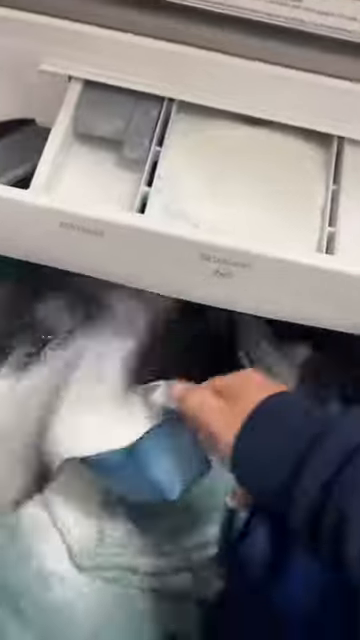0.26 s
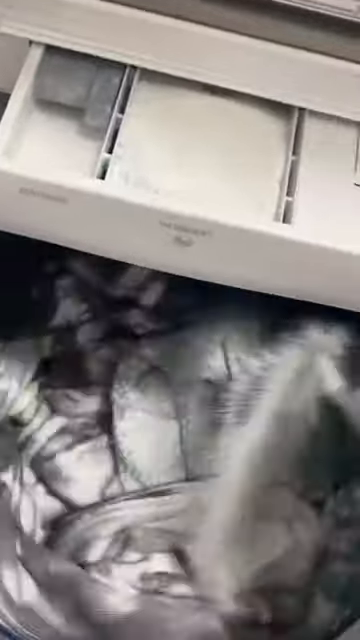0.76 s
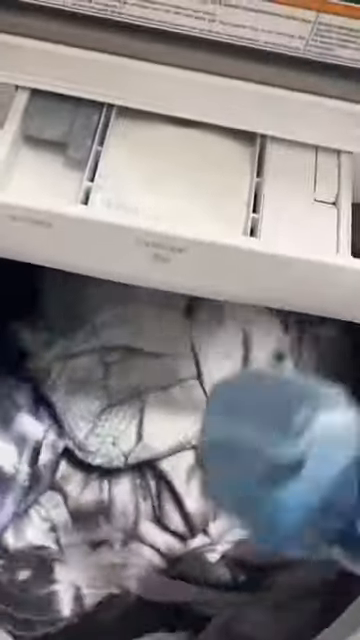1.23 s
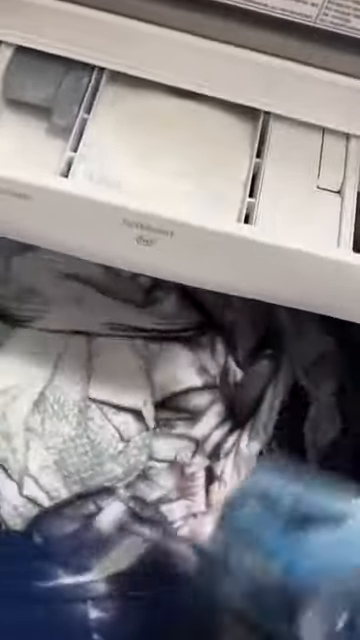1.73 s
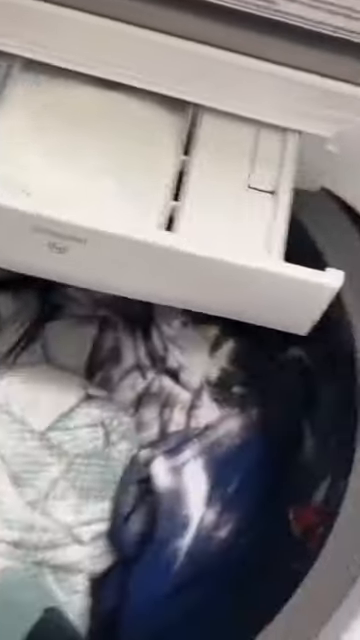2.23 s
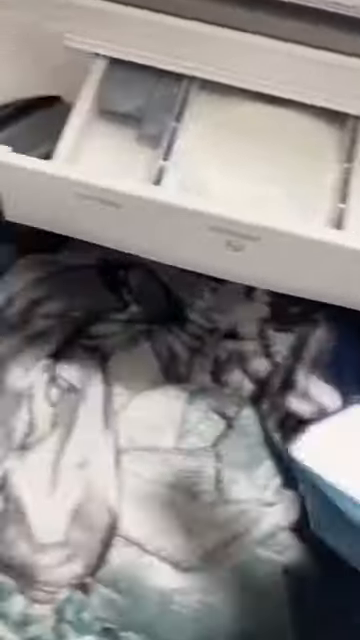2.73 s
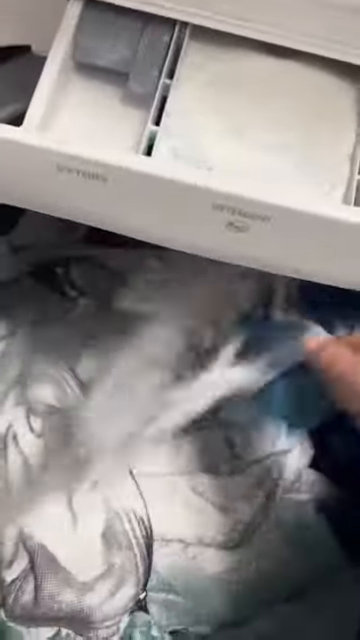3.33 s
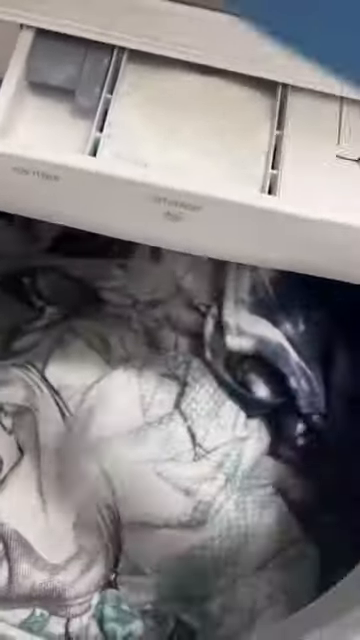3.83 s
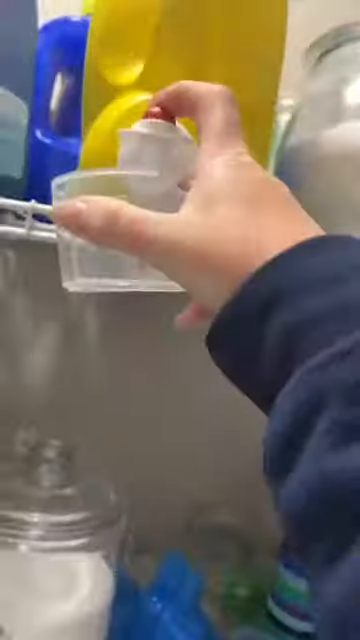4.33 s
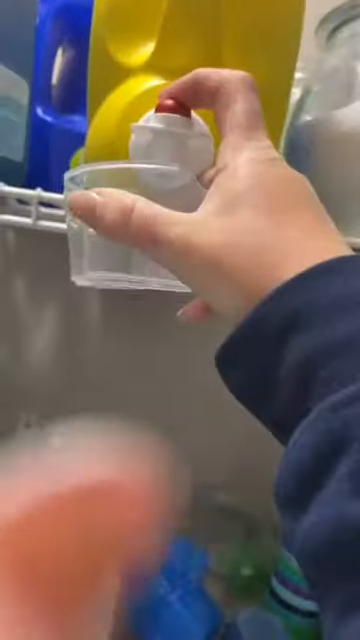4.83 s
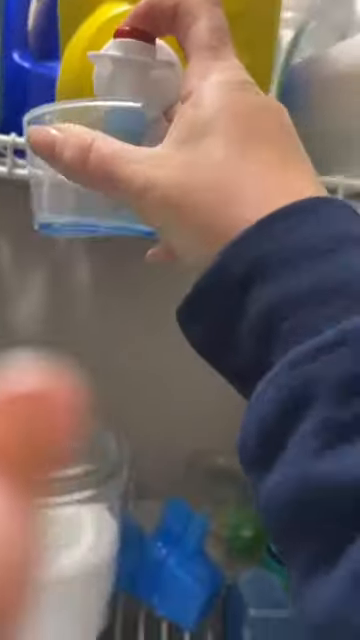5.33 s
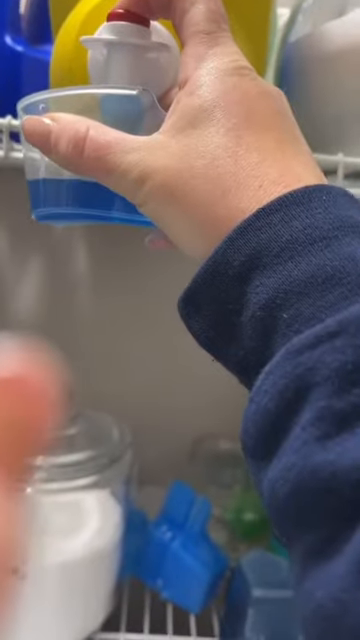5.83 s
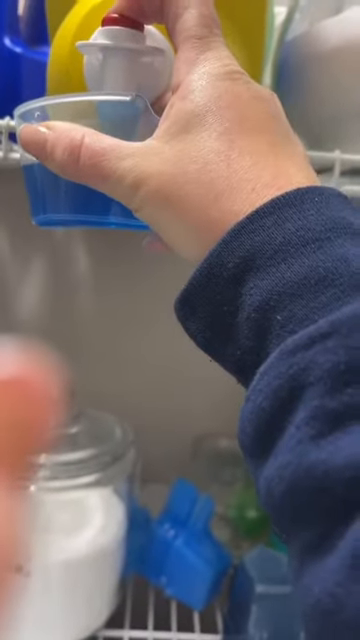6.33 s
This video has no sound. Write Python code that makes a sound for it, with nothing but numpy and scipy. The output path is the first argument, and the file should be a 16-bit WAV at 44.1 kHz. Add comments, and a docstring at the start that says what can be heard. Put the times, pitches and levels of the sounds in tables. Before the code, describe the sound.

Plastic scoop clatters between soft sprays of washing powder and a crunchy refill; after a brief silence, a button squelches and detergent trickles over room hum.

```python
"""Powder sifts from a shaken plastic scoop onto laundry in a top-loading machine: coloured grains in spurts.
The scoop is knocked empty (clicks and rattle through plastic modes); the steel drum is bumped and booms.
The scoop crunches into the powder box to refill, then pours and is knocked empty again.
After a short silence, a quiet room: hiss and mains hum start with a brief buzz, a tap button squelches,
the cup ticks in the fingers and liquid detergent trickles into it as random grains through cup modes."""
import sys
import numpy as np
from scipy import signal
from scipy.fft import rfft, irfft
from scipy.io import wavfile

SR = 44100
rng = np.random.default_rng(int(sys.argv[2]) if len(sys.argv) > 2 else 0)


def generate_wav(sig):
    """Save sig (samples, or channels by samples) to the path in sys.argv[1] as 16-bit PCM at SR."""
    pcm = np.round(np.clip(np.atleast_2d(sig).T, -1, 1) * 32767).astype(np.int16)
    wavfile.write(sys.argv[1], SR, pcm)


N = 289458
TIME = np.arange(N) / SR  # s
TAPS = 4096  # filter length, samples
HZ = np.fft.rfftfreq(TAPS, 1 / SR)

# scoop knocks: t/s, blow/dB, rattle/dB, rattle peak re blow/s, rattle fall/s, powder left/0-1,
# contact/0 side - 1 rim, tilt/dB per octave
KNOCKS = [(0.7355, -26.5, -39, .004, .014, .4, .2, -1.8), (1.2370, -64, -50, 0, .012, .5, .2, -5),
          (1.4145, -33, -21.5, .003, .018, 1, 0, -3.4), (1.5055, -27, -23, -.001, .023, .9, .1, .6),
          (1.6160, -24.5, -23, -.005, .018, 0, .1, .3), (1.7070, -19.5, -26, -.002, .02, 0, .1, .3),
          (3.4360, -36.5, -44, -.004, .01, .3, 1, 4), (3.6030, -44, -42, .007, .012, .6, .4, .2),
          (3.9515, -17, -17.5, .002, .02, 1, .55, .5), (4.0478, -15.5, -20.5, .001, .023, .5, .85, .1),
          (4.1605, -14, -24, .001, .016, .1, 1, .8)]
# silence between the two places: start/s, end/s
PAUSE_S = (4.340, 4.449)


def amp(db):
    """Decibels to gain."""
    return 10 ** (np.asarray(db) / 20)


def evened(x):
    """Scales to rms 1."""
    return x / np.sqrt(np.mean(x ** 2) + 1e-20)


def read(points, hz=HZ):
    """Interpolates an (f, value) table on a log-frequency axis."""
    f, value = np.transpose(points)
    return np.interp(np.log(hz + 1), np.log(f + 1), value)


def add(mix, s, sound):
    """Mixes a sound into mix, in place, at time s."""
    start = round(s * SR)
    sound = sound[max(-start, 0):]
    part = mix[max(start, 0):][:len(sound)]
    part += sound[:len(part)]


def resonances(modes):
    """Gain over frequency of a body with (Hz, width Hz, dB) modes; their powers add."""
    power = sum(amp(db) ** 2 / (1 + ((HZ - hz) / width) ** 2 * 2) ** 2 for hz, width, db in modes)
    return np.sqrt(power) + amp(-75)


def colour(x, gain):
    """Minimum-phase filter of unit energy with the given gain shape over frequency."""
    cepstrum = irfft(np.log(np.maximum(gain / gain.max(), amp(-100))))
    cepstrum[1:TAPS // 2] *= 2  # fold to the causal side
    cepstrum[TAPS // 2 + 1:] = 0
    ring = irfft(np.exp(rfft(cepstrum)))
    return signal.oaconvolve(x, ring / np.linalg.norm(ring))[:len(x)]


def blow(db, spread_s, soft_hz=7000):
    """A click of this rms over 10 ms before softening; the wall's dispersion delays its treble most."""
    phase = np.pi * spread_s * HZ ** 2 / HZ[-1]
    click = irfft(np.exp(-1j * phase) / np.hypot(1, HZ / soft_hz))[:TAPS // 2]
    return amp(db) * np.sqrt(SR / 100) * click


def swell(t, rise, fall):
    """Exponential growth up to t = 0 and decay after it."""
    return np.exp(np.minimum(t / rise, -t / fall).clip(-60))


def grains(size, per_s, spread_db):
    """Random tiny impacts of uneven size, rms 1."""
    sizes = amp(spread_db * np.minimum(rng.exponential(1, size), 4))
    hits = rng.random(size) < per_s / SR
    return evened(sizes * rng.standard_normal(size) * hits)


def bursts(rows, rise):
    """Gain over time of (peak s, dB, fall s) bursts whose powers add."""
    power, t = np.zeros(N), np.arange(-SR // 4, SR) / SR
    for s, db, fall in rows:
        add(power, s + t[0], (amp(db) * swell(t, rise, fall)) ** 2)
    return np.sqrt(power)


def held(start, end, rise, fall):
    """Gain over time: exponential attack up to start, hold until end, exponential release."""
    return swell(TIME - np.clip(TIME, start, end), rise, fall)


def settling():
    """Gain over time of the laundry as it shifts and settles after each movement."""
    # settles: t/s, level/dB
    settles = [(.31, -53), (.80, -48), (1.78, -54), (2.22, -59), (2.80, -53), (3.72, -56), (4.23, -54)]
    rise_s, fall_s = .05, .105
    return bursts([(s, db, fall_s) for s, db in settles], rise_s)


def air():
    """Low noise of the room round the machine; swells as the laundry shifts."""
    # noise spectrum: f/Hz, level/dB
    air_spectrum = [(25, 3), (60, 0), (135, 2), (220, -6), (500, -8.5), (750, -12), (1150, -12),
                    (1600, -19), (2500, -21), (4200, -23), (7800, -28), (10500, -37), (15500, -40)]
    still_db = -62.5
    level = np.hypot(amp(still_db), settling())
    return level * colour(rng.standard_normal(N), amp(read(air_spectrum)))


def spurts(first, last, db):
    """One (s, dB, fall s) spurt per shake of the wrist: arched over the pour, slightly uneven."""
    shake_s, fall_s = .0513, .016
    arch_db, scatter_db = 7, 1
    times = np.arange(first, last + shake_s / 2, shake_s)
    arch = np.sin(np.pi * np.linspace(.1, .75, num=len(times)))
    uneven = rng.standard_normal(size=32)
    return [(s, db + arch_db * (a - 1) + scatter_db * u, fall_s)
            for s, a, u in zip(times, arch, uneven)]


def powder():
    """Grains land on cloth in a steady sift and a spurt per shake, then slide down the folds with a thin hiss."""
    # pours: first shake/s, last shake/s, sift/dB, spurt/dB
    pours = [(.14, .70, -57.5, -46.5), (3.078, 3.595, -52.8, -43.8)]
    # landing spectrum: f/Hz, level/dB
    landing_spectrum = [(150, -14), (330, -8), (560, -6), (790, 0), (1170, -1.5), (1600, -8), (2450, .5),
                        (4100, -12.5), (7700, -12), (9000, -17), (10500, -23), (15500, -25)]
    # slide modes: f/Hz, width/Hz, level/dB
    slide_modes = [(4250, 300, 0), (5500, 900, -10), (2800, 900, -7)]
    sift_rise_s, sift_fall_s, spurt_rise_s = .055, .16, .0055
    slide_after_s, slide_db, slide_rise_s, slide_fall_s = .21, -58, .09, .04
    settle_powder_db = -5  # loose powder trickling as the laundry settles, re settling
    flow = amp(settle_powder_db) * settling()
    for first, last, sift_db, spurt_db in pours:
        sift = amp(sift_db) * held(first, last, sift_rise_s, sift_fall_s)
        shaken = bursts(spurts(first, last, spurt_db), spurt_rise_s)
        flow = np.hypot(flow, np.hypot(sift, shaken))
    landing = colour(flow * grains(N, per_s=14000, spread_db=1.4), amp(read(landing_spectrum)))
    slide_rows = [(last + slide_after_s, slide_db, slide_fall_s) for _, last, _, _ in pours]
    slides = bursts(slide_rows, slide_rise_s)
    return landing + colour(slides * rng.standard_normal(N), resonances(slide_modes))


def room(x):
    """A small hard room: sparse reflections, each band dying at its own speed."""
    # decay: f/Hz, t60/s
    decay = [(120, .55), (400, .5), (1200, .28), (2200, .2), (4000, .19), (12000, .14)]
    t = np.arange(SR) / SR
    taps = rng.standard_normal(SR) * (rng.random(SR) < 3000 / SR) * (t > .005)
    hz, frame_s, z = signal.stft(taps, SR, nperseg=256)
    fading = amp(-60 * frame_s / read(decay, hz)[:, None])
    dulling = np.hypot(1, hz / 2200)[:, None]
    tail = signal.istft(z * fading / dulling, SR, nperseg=256)[1]
    return signal.oaconvolve(x, tail / np.linalg.norm(tail))[:N]


def thumps(sag=.15, ragged=.3, ragged_hz=45):
    """Soft thumps of hand and laundry: a short, raggedly modulated sine arch that sinks slightly in pitch."""
    # thumps: t/s, level/dB, f/Hz, length/s
    soft_blows = [(.27, -45, 140, .08), (.29, -40, 72, .055), (.755, -36, 70, .04), (.785, -42, 170, .06),
                  (1.665, -35, 60, .04), (1.76, -38, 80, .05), (2.70, -40, 58, .05),
                  (2.703, -28.5, 180, .035), (2.825, -42, 165, .025), (3.13, -41, 280, .045),
                  (3.602, -38, 230, .025), (3.625, -43, 165, .055), (4.29, -38, 105, .05)]
    out = np.zeros(N)
    for s, db, hz, length in soft_blows:
        t = np.arange(0, length, 1 / SR)
        cycles = hz * t * (1 + sag * (1 - t / length) / 2)
        add(out, s, amp(db) * np.sin(np.pi * t / length) * np.sin(2 * np.pi * cycles))
    return out * (1 + ragged * colour(rng.standard_normal(N), resonances([(ragged_hz, ragged_hz, 0)])))


def scoop(spread_s=.004, roundness=1.7):
    """Powder rattles in a rounded swell around each blow and the scoop chatters; all ring the plastic."""
    # scoop modes: f/Hz, width/Hz, side-struck level/dB, rim-struck level/dB
    scoop_modes = [(275, 150, -15, -20), (540, 130, -7, -17), (870, 100, -17, -8.5), (1040, 110, -1.5, -11),
                   (1155, 115, -6, 1), (1280, 130, -.5, -11), (1500, 160, -20, -13), (1720, 180, -13, -18),
                   (2020, 150, -16, -6.5), (2290, 170, -13, -19), (2560, 200, -23, -10),
                   (3000, 260, -19, -17), (3650, 450, -23.5, -20.5), (5000, 350, -28, -22),
                   (5750, 500, -29, -23), (7100, 900, -26, -24), (8700, 1200, -32.5, -27.5),
                   (14000, 5000, -43, -37)]
    rattle_rise_s = .014
    crack_db, crack_s = 6, .002  # wall crunch on contact: level re blow
    gap_s, gap_ratio, loss_db = .0075, .8, 4  # rebounds: first gap, ratio of gaps, loss per contact
    empty_rebound_db, loaded_rebound_db = -18, -3  # first rebound re blow
    load_damping = .5  # share by which a full load widens the modes
    out, t = np.zeros(N), np.arange(-SR // 10, SR // 8) / SR
    for s, blow_db, rattle_db, lag, fall, load, rim, tilt_db in KNOCKS:
        rattle_swell = np.exp(-np.maximum((lag - t) / rattle_rise_s, (t - lag) / fall) ** roundness)
        crack = amp(blow_db + crack_db) * swell(t - crack_s, crack_s / 2, crack_s)
        level = np.hypot(amp(rattle_db) * rattle_swell, crack)
        force = level * grains(len(t), per_s=9000, spread_db=1.1)
        add(force, -t[0], blow(blow_db, spread_s, soft_hz=10000))
        rebound_db = empty_rebound_db + load * (loaded_rebound_db - empty_rebound_db)
        delays = np.cumsum(gap_s * gap_ratio ** np.arange(3))
        for k, delay in enumerate(delays):
            add(force, delay - t[0], blow(blow_db + rebound_db - k * loss_db, spread_s, soft_hz=4000))
        body = resonances([(hz, width * (1 + load_damping * load), side + rim * (edge - side))
                           for hz, width, side, edge in scoop_modes])
        tilt = amp(tilt_db * np.log2(HZ / 1200 + .2))
        add(out, s + t[0], colour(force, body * tilt))
    return out


def drum(knocks, rock_hz=900):
    """The steel drum booms and judders when bumped, rocks on dully, clinks, and rings faintly with the scoop."""
    # bumps: t/s, blow/dB, judder/dB
    bumps = [(0.7480, -47, -45), (0.7970, -50, -43), (1.4150, -38, -33), (1.9975, -24, -20),
             (2.1900, -45, -41), (2.7200, -40, -34)]
    # clinks against the stops: t/s, level/dB, fall/s
    clink_rows = [(1.9970, -38, .011), (2.0340, -38, .03), (2.1280, -39, .008), (2.2610, -47, .006)]
    # drum modes: f/Hz, width/Hz, level/dB
    drum_modes = [(137, 18, 4), (185, 40, -1.5), (247, 24, 0), (314, 26, -1), (410, 28, 4), (480, 45, -6),
                  (549, 22, 0), (678, 50, -12), (781, 50, -11), (920, 70, -8), (1046, 60, -3.5),
                  (1265, 80, -5), (1900, 800, -26)]
    # clink spectrum: f/Hz, level/dB
    clink_spectrum = [(500, -20), (1300, -2), (2500, 0), (4500, -12), (7000, -11), (9000, -15),
                      (10500, -25), (15500, -29)]
    judder_fall_s, rock_fall_s = .032, .13
    rock_db = -13  # re judder
    clink_boom_db = 2  # drive of the drum re clink
    clinks = bursts(clink_rows, rise=.0015)
    judder = bursts([(s, db, judder_fall_s) for s, _, db in bumps], rise=.005)
    force = np.hypot(judder, amp(clink_boom_db) * clinks) * grains(N, per_s=1500, spread_db=1.2)
    for s, db, _ in bumps:
        add(force, s, blow(db, spread_s=.003))
    rocking = bursts([(s, db + rock_db, rock_fall_s) for s, _, db in bumps], rise=.005)
    rocking = rocking * grains(N, per_s=600, spread_db=1.2)
    body = resonances(drum_modes)
    boom = colour(force + amp(-33) * knocks, body)
    dull = colour(rocking, body / (1 + (HZ / rock_hz) ** 2))
    return boom + dull + colour(clinks * grains(N, per_s=9000, spread_db=1.5), amp(read(clink_spectrum)))


def jolts():
    """The tub answers each knock of the scoop with a dull thud: a grain burst through tub modes."""
    # tub modes: f/Hz, width/Hz, level/dB
    tub_modes = [(250, 130, 0), (400, 200, -1), (650, 200, -6)]
    after_s, jolt_db, fall_s = .008, -13, .014  # level re blow
    push = bursts([(s + after_s, db + jolt_db, fall_s) for s, db, *_ in KNOCKS], rise=.002)
    return colour(push * grains(N, per_s=2500, spread_db=1.1), resonances(tub_modes))


def sleeve():
    """Cloth brushes on cloth as the arm moves: grains under Gaussian swells."""
    # swishes: t/s, level/dB, sigma/s
    swishes = [(1.125, -57, .052), (2.372, -49, .021), (2.548, -57, .012), (2.905, -59, .015)]
    # cloth spectrum: f/Hz, level/dB
    cloth_spectrum = [(400, -14), (800, -5), (1180, 0), (1630, -6), (2900, -5), (5000, -11), (8000, -8),
                      (10500, -18), (15500, -21)]
    speed = sum(amp(db) * np.exp(-((TIME - s) / sigma) ** 2 / 2) for s, db, sigma in swishes)
    return colour(speed * grains(N, per_s=9000, spread_db=2.2), amp(read(cloth_spectrum)))


def refill():
    """The scoop thuds into the powder box (a click through its modes) and crunches through the grains."""
    # thrust: t/s, blow/dB, crunch/dB, rise/s, fall/s
    thrust = (2.7093, -21, -24.5, .006, .02)
    # box modes: f/Hz, width/Hz, level/dB
    box_modes = [(175, 55, 4), (270, 70, -3), (530, 130, 1), (900, 400, -10)]
    # crunch spectrum: f/Hz, level/dB
    crunch_spectrum = [(60, -14), (150, 0), (350, -7), (520, -4), (800, -13), (1100, -11), (1450, -16),
                       (2500, -11), (3300, -18), (4500, -29), (5700, -24), (9000, -33), (10500, -38),
                       (15500, -41)]
    s, blow_db, crunch_db, rise, fall = thrust
    force = np.zeros(N)
    add(force, s, blow(blow_db, spread_s=.003))
    crunch = bursts([(s + .007, crunch_db, fall)], rise) * grains(N, per_s=10000, spread_db=1.5)
    return colour(force, resonances(box_modes)) + colour(crunch, amp(read(crunch_spectrum)))


def hum():
    """Fan-like hiss in fixed resonances and wavering mains harmonics that start with a brief buzz."""
    # hiss spectrum: f/Hz, level/dB
    hiss_spectrum = [(25, -17), (75, -15), (130, -1), (180, -1), (240, -8), (330, -4), (700, -2),
                     (1100, -8.5), (2000, -8.5), (4000, -12.5), (5800, -13.5), (7800, -10.5), (9000, -16),
                     (10500, -24), (15800, -27)]
    # hiss resonances: f/Hz, width/Hz, boost/dB
    hiss_peaks = [(130, 25, 5), (515, 45, 5), (600, 25, 2), (725, 60, 6), (955, 30, 4), (1615, 45, 6),
                  (2990, 60, 4), (8000, 1200, 2)]
    # harmonics: f/Hz, mean rms at the end/dB, rms added by the buzz/dB
    harmonics = [(120, -71, -72), (360, -59.5, -60), (480, -72, -57), (600, -74, -57), (720, -72, -61)]
    hiss_db, growth_db_per_s = -55.7, 2.6  # level at the end of the pause; grows as the cup fills
    hum_growth = 1.8  # hum follows hiss gain to this power
    buzz_end_s, buzz_fade_s = 4.535, .03
    boosts_db = sum(db / (1 + (2 * (HZ - hz) / width) ** 2) for hz, width, db in hiss_peaks)
    loud = amp(hiss_db + growth_db_per_s * (TIME - PAUSE_S[1]))
    out = loud * colour(rng.standard_normal(N), amp(read(hiss_spectrum) + boosts_db))
    buzz = np.clip((buzz_end_s - TIME) / buzz_fade_s, 0, 1)
    for hz, db, buzz_db in harmonics:
        waver = np.interp(TIME, np.linspace(0, TIME[-1], num=50), rng.standard_normal(size=50))
        steady = amp(db) * (loud / loud.max()) ** hum_growth * (1 + .25 * waver)
        rms = steady + amp(buzz_db) * buzz
        out += np.sqrt(2) * rms * np.sin(2 * np.pi * (hz * TIME + rng.random()))
    return out


def tap():
    """A rubber button squelches in, the cup ticks in the fingers, thick liquid trickles into the plastic cup."""
    # button press: t/s, level/dB, rise/s, fall/s
    press = (4.535, -42, .012, .009)
    # button modes: f/Hz, width/Hz, level/dB
    button_modes = [(318, 60, 0), (614, 90, -1), (1390, 90, -2), (1590, 70, 0)]
    # finger ticks: t/s, level/dB
    tick_rows = [(4.645, -53), (5.2, -51), (5.78, -53), (5.965, -49), (6.118, -42.5), (6.205, -53)]
    # cup modes: f/Hz, width/Hz, level/dB
    cup_modes = [(1950, 350, 0), (2800, 600, -2), (5000, 1500, -9)]
    tick_fall_s = .005
    full_flow_s, flow_rise_s, flow_db = 5.35, .2, -58.5
    s, db, rise, fall = press
    squeeze = bursts([(s, db, fall)], rise) * grains(N, per_s=2500, spread_db=1.2)
    squelch = colour(squeeze, resonances(button_modes))
    flow = amp(flow_db) * held(full_flow_s, TIME[-1], flow_rise_s, flow_rise_s)
    trickle = colour(flow * grains(N, per_s=1200, spread_db=2.8), resonances(cup_modes))
    slips = bursts([(at, tick_db, tick_fall_s) for at, tick_db in tick_rows], rise=.002)
    tick_body = resonances([(2000, 1500, -4), (4800, 2400, 0)])
    ticks = colour(slips * rng.standard_normal(N), tick_body)
    return squelch + trickle + ticks


def scene():
    """The washing machine, a silence, then the detergent tap."""
    knocks = scoop()
    near = knocks + drum(knocks) + jolts() + refill() + thumps() + powder() + sleeve()
    washer = near + amp(-27) * room(near) + air()
    detergent = hum() + tap()
    return (washer * (TIME < PAUSE_S[0]) + detergent * (TIME > PAUSE_S[1]))[None]


def record(dry, ceiling=.8):
    """Soft clipping, felt by the loudest knocks, then a linear-phase low-pass."""
    edge_hz = 15900
    clipped = ceiling * np.tanh(dry / ceiling)
    low_pass = signal.firwin(511, edge_hz, window=("kaiser", 9), fs=SR)
    return signal.oaconvolve(clipped, low_pass[None], "same")


dry = scene()
out = record(dry)
generate_wav(out)
```